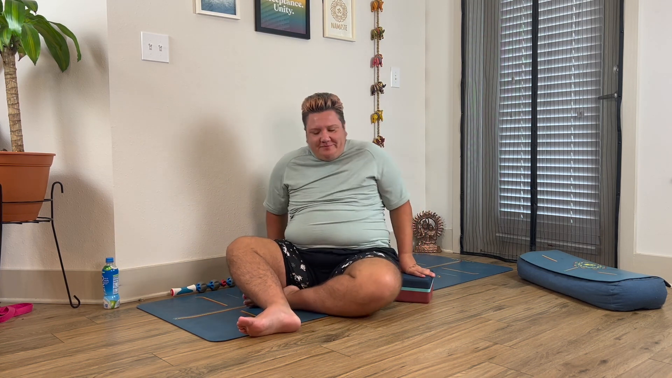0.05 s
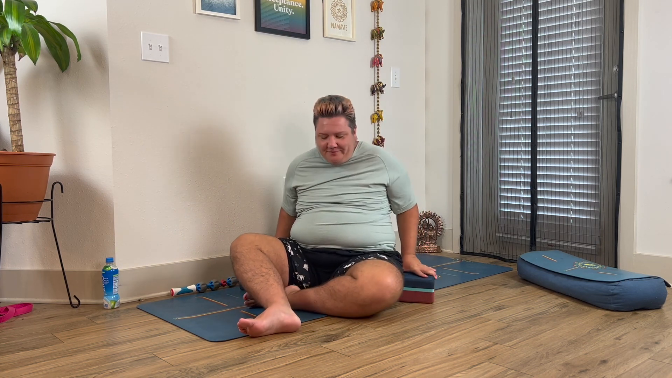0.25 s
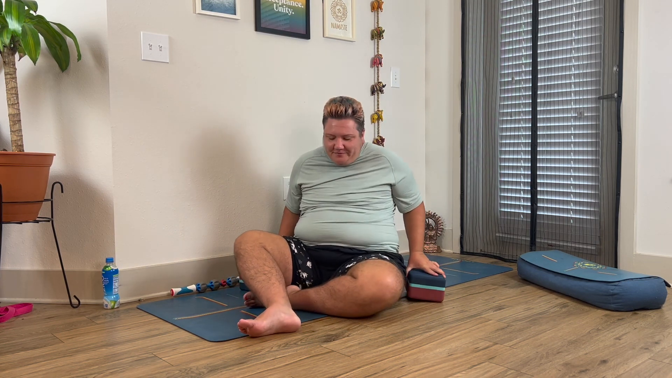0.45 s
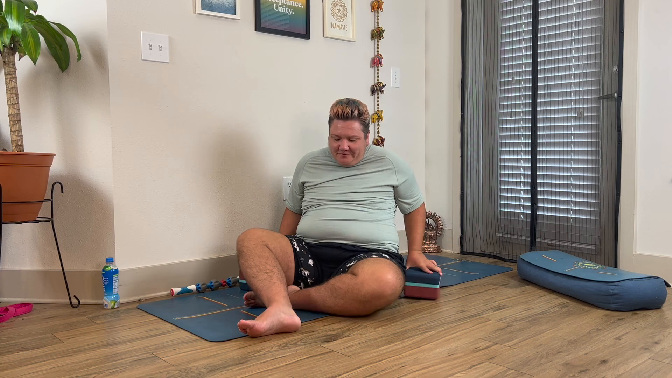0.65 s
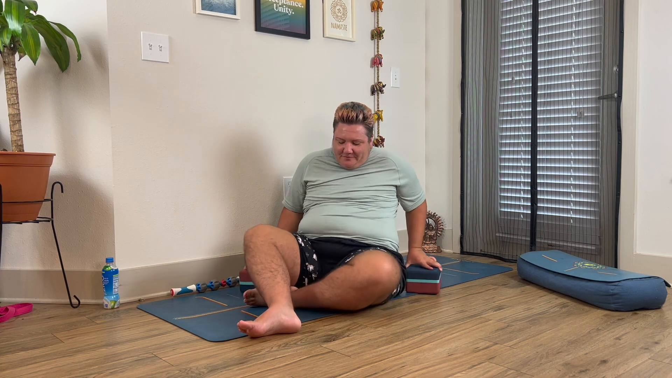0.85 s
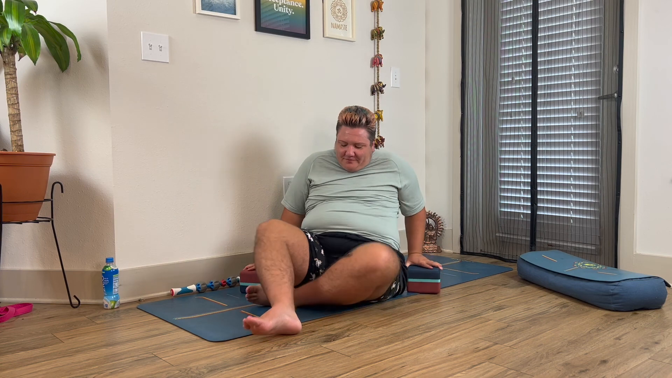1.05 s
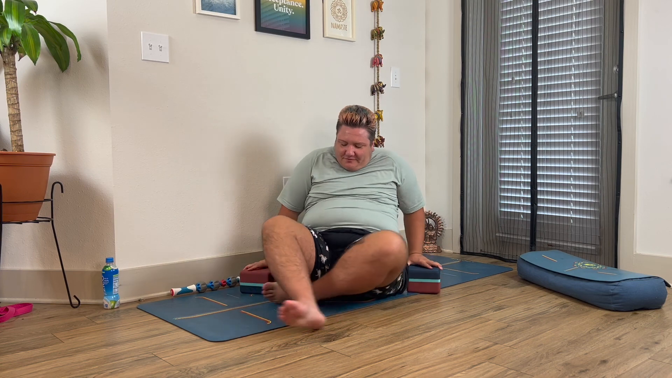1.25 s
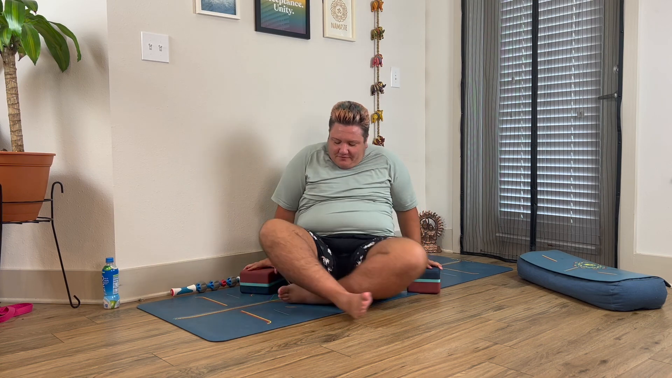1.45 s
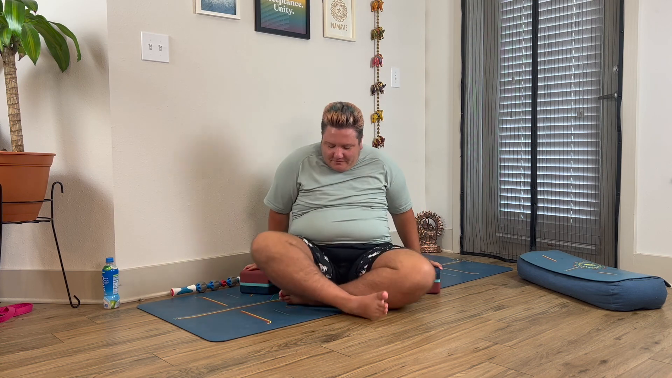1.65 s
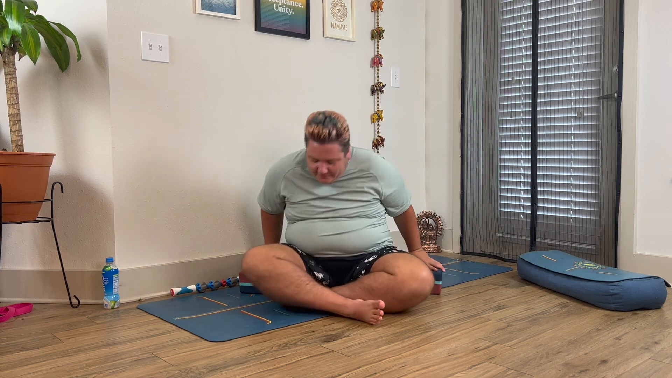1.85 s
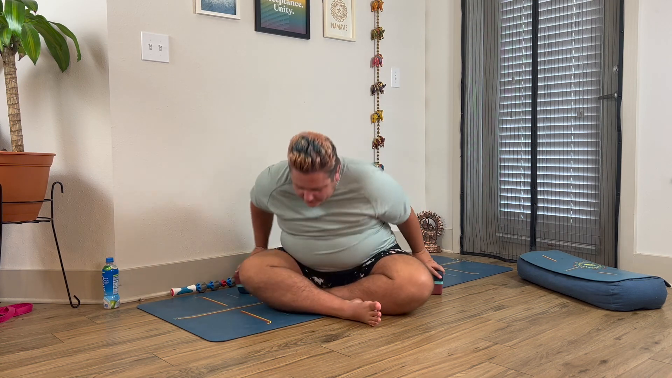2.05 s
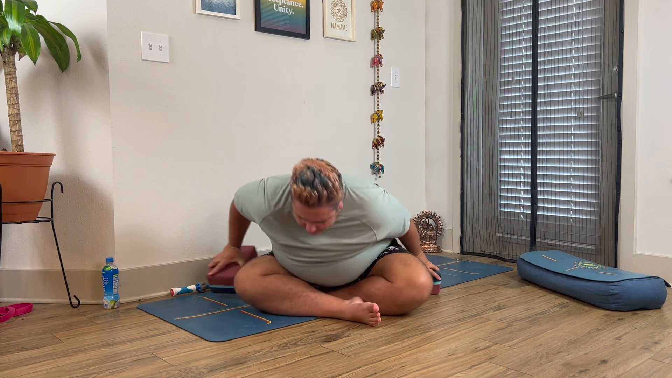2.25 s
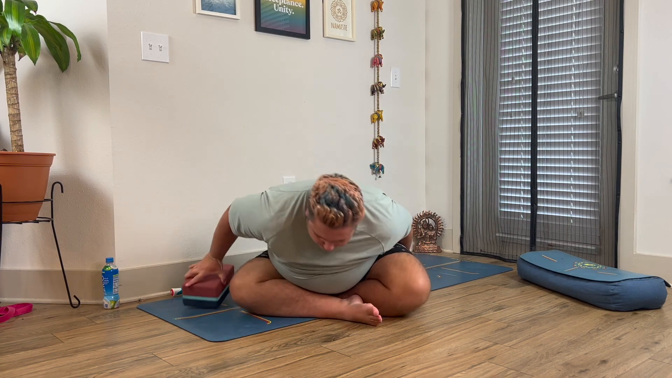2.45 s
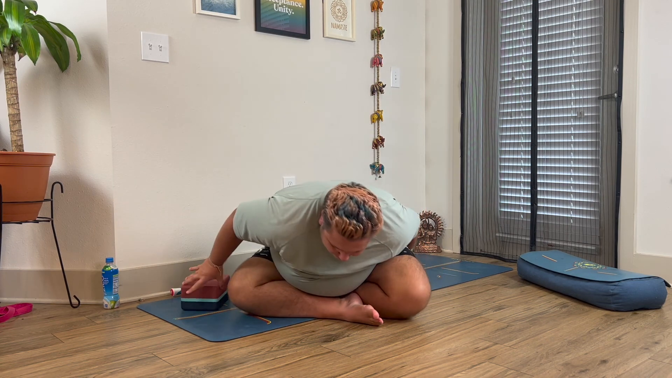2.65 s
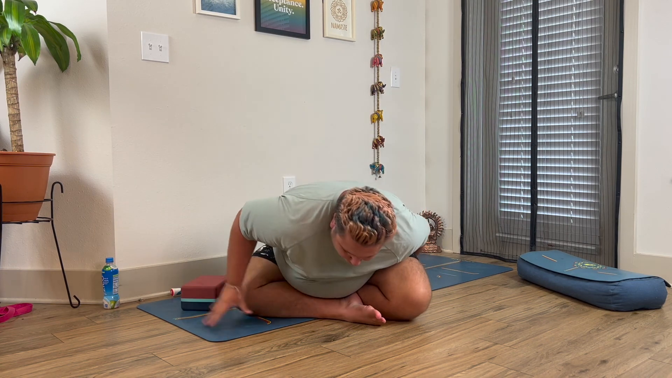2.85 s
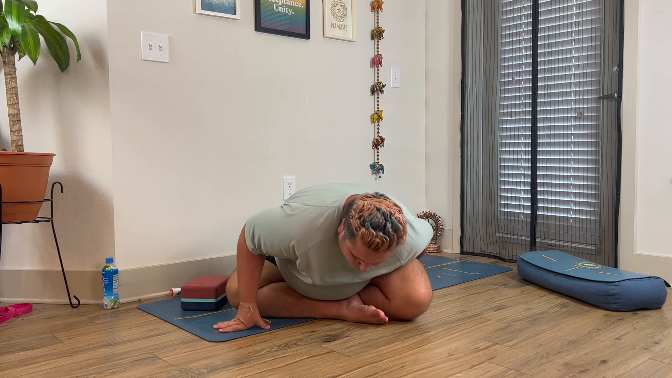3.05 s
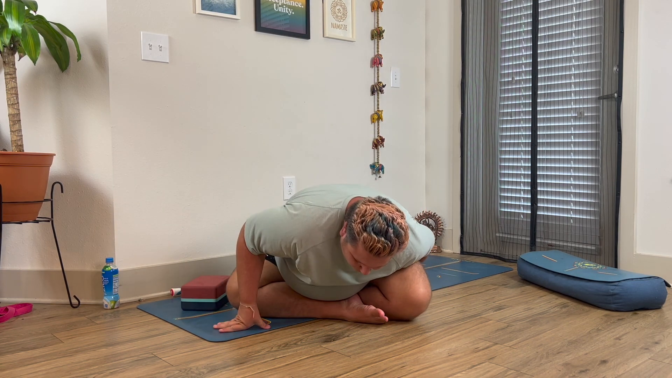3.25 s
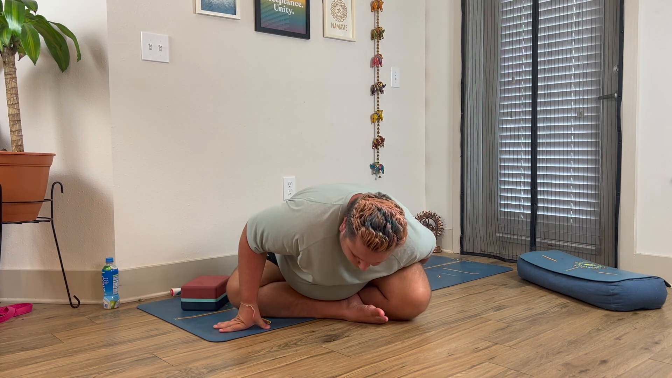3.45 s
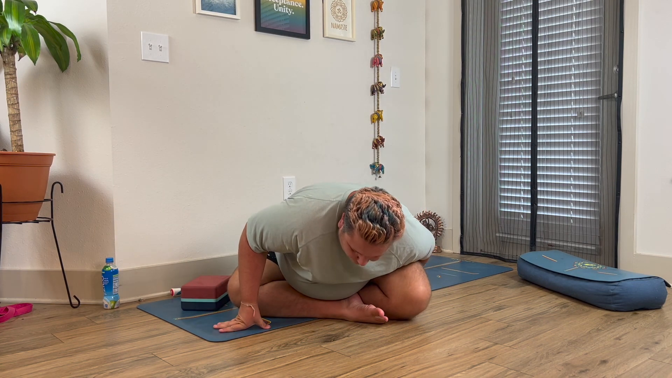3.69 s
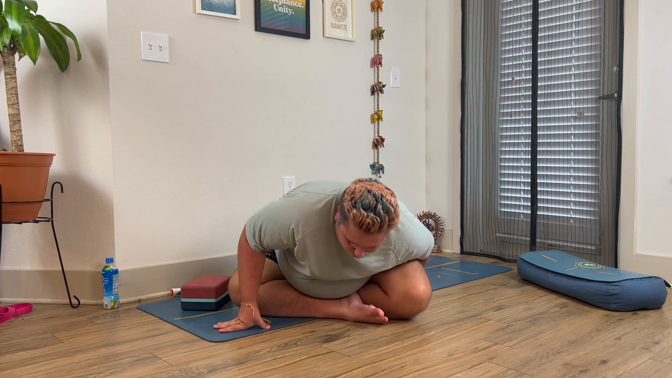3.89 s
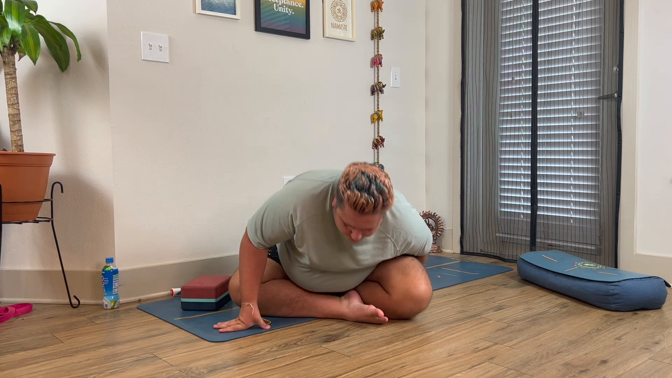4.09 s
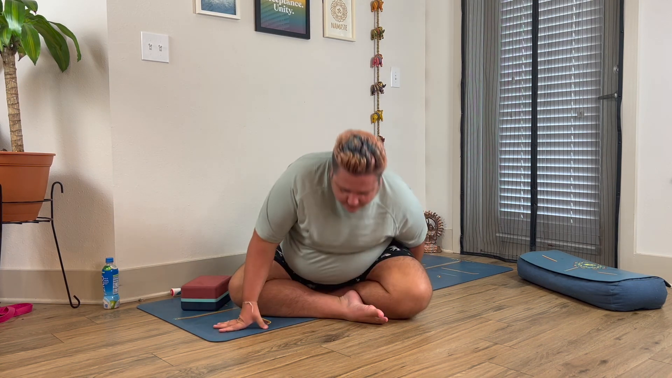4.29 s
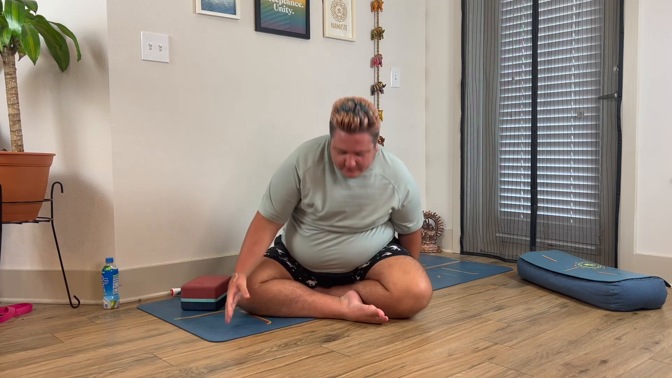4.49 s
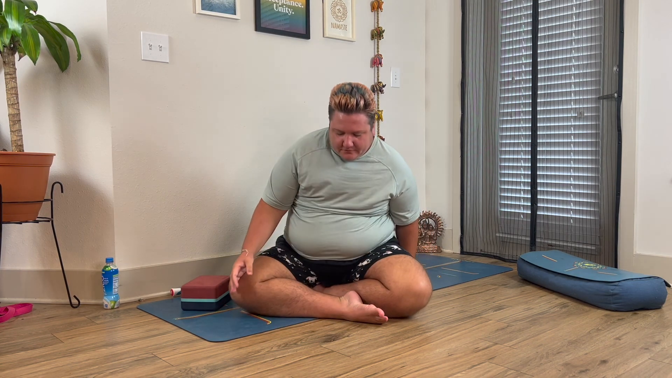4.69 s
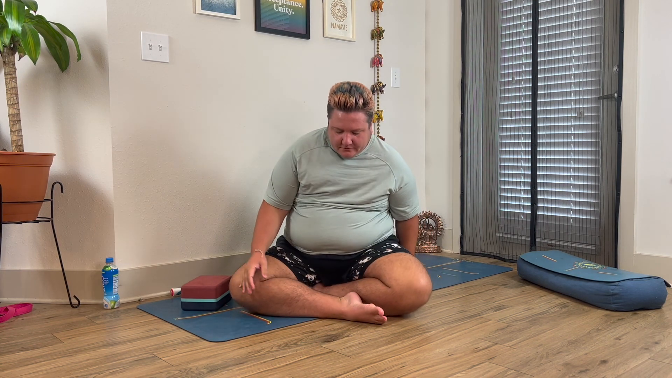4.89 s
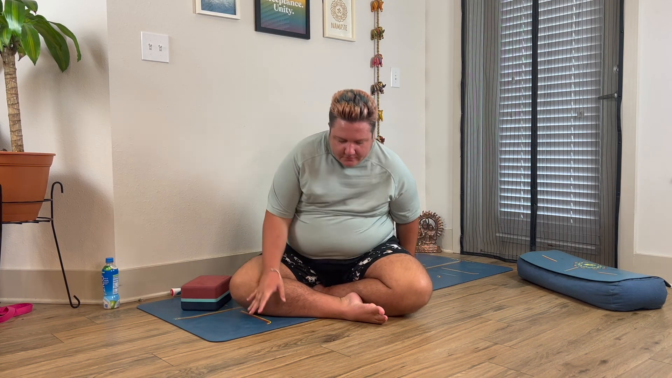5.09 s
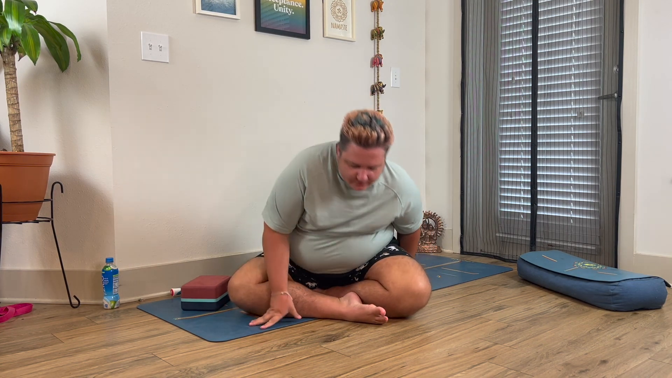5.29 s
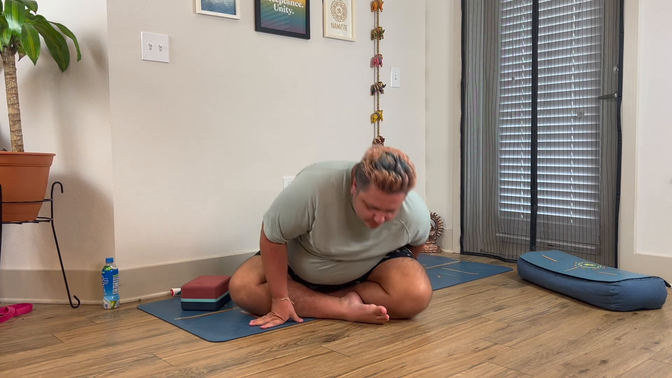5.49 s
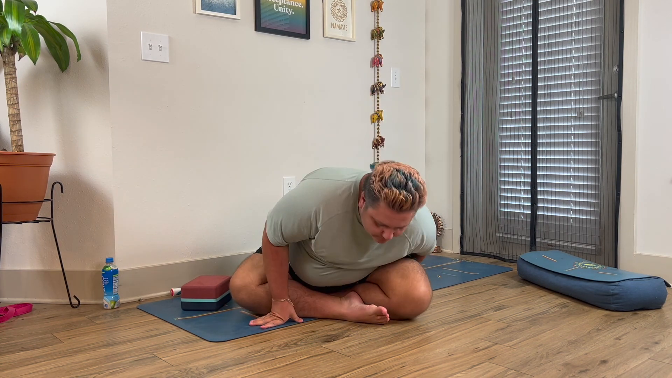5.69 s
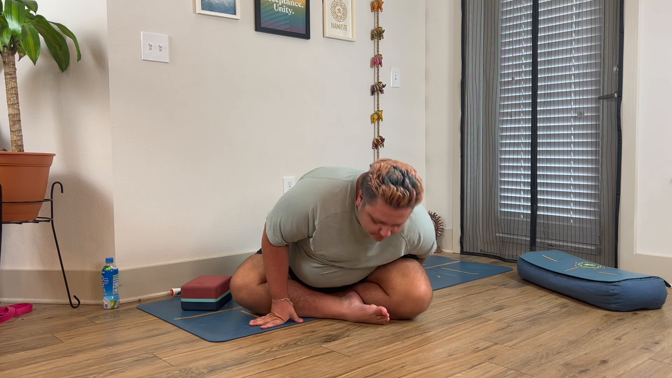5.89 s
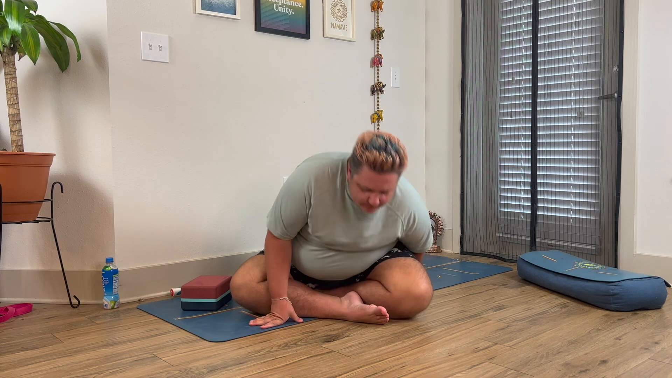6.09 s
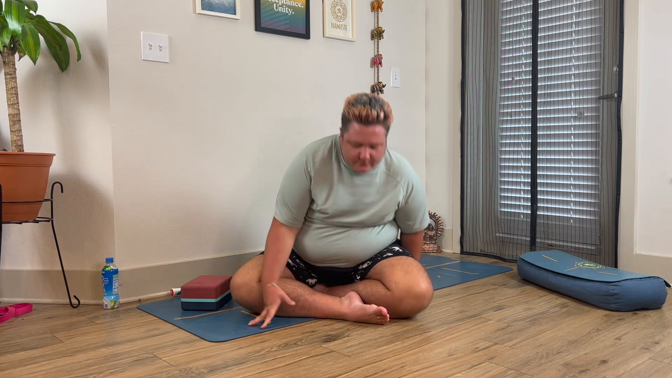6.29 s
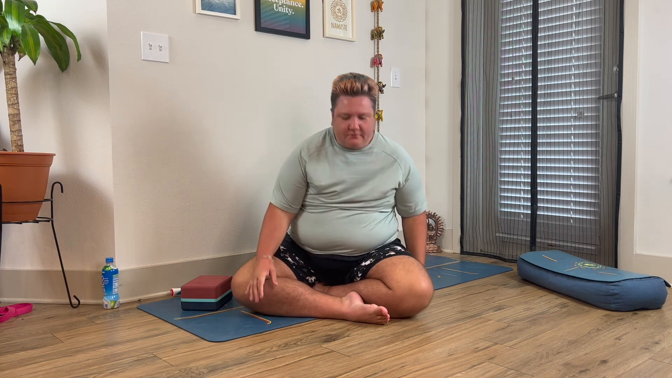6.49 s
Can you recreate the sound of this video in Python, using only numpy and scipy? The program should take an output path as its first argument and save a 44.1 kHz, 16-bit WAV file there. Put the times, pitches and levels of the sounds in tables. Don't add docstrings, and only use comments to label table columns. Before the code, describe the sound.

In a small quiet room with a faint distant appliance hum, foam and clothing rub over a padded mat in uneven strokes with brief squeaky chatter. Shifting body weight knocks dully on the wooden floor, then a foam block lands with a loud, low slap and short ring. Brushing fades, leaving near stillness, tiny rustles and ticks, and a soft brush at the end. Stereo pickup from a small device microphone.

```python
import sys
import numpy as np
from scipy import signal
from scipy.fft import rfft, irfft, next_fast_len
from scipy.io import wavfile
from scipy.ndimage import uniform_filter1d, map_coordinates

SR = 44100
rng = np.random.default_rng(int(sys.argv[2]) if len(sys.argv) > 2 else 0)


def level_to_linear(level):
    exponent = np.asarray(level, float) / 20
    return 10 ** exponent


def pcm_store(signal):
    levels = np.round(np.clip(np.atleast_2d(signal), -1, 1) * 32767)
    wavfile.write(sys.argv[1], SR, levels.astype(np.int16).T)


N = 288325
T = np.arange(N) / SR

# time in seconds, level in dB.
HUM_BEAT = [(0.0, -61), (0.56, -65.5), (0.75, -58.5), (1.3, -70), (1.66, -64.5), (1.98, -71), (2.4, -59),
            (3.13, -61.5), (3.7, -69.5), (4.04, -63.5), (4.45, -70), (4.73, -64), (5.21, -69.5), (5.7, -62),
            (5.95, -71), (6.28, -62.5), (6.54, -67)]
# crest in seconds, rumble in dB, rise and fall in seconds.
RUMBLE_SWELLS = [(.05, -61, 0.17, 0.37), (.5, -58, 0.12, 0.23), (1.55, -57, .08, 0.044), (1.02, -50.5, 0.34, 0.12),
                 (1.86, -54.5, 0.24, .35), (2.64, -41, 0.17, 0.16), (2.9, -51.5, .2, 0.32), (3.25, -58, 0.14, 0.11),
                 (3.4, -57, .08, .08), (3.63, -56.5, 0.12, 0.071), (4.12, -65, .15, 0.11), (4.7, -62, .15, 0.35),
                 (5.46, -57.5, 0.11, 0.041), (5.6, -67, 0.068, 0.19), (6.07, -65, 0.07, 0.09)]
# frequency in Hz, density in dB per Hz.
BOARD_COLOUR = [(20, -63.5), (35, 4), (60, 11), (110, 3.5), (200, -9.5), (400, -41)]
AIR_COLOUR = [(150, -23), (330, -26.5), (520, -35), (1300, -39.5), (1850, -44), (2020, -35.5),
              (2200, -48.5), (2700, -56.5), (6000, -46.5), (6600, -36), (7300, -36.5), (7800, -71),
              (12500, -62.5), (15700, -71.5)]

# crest in seconds, level in dB, rise and fall in seconds.
SCUFFS = [(.11, -63.5, 0.11, 0.23), (.5, -66, .2, 0.31), (.88, -72, .08, .05), (1.45, -68.5, 0.26, 0.096),
          (1.9, -66.5, 0.27, 0.14), (2.1, -65, 0.089, 0.074), (2.22, -59, 0.073, 0.1), (2.5, -66, 0.2, .09),
          (2.8, -61, .1, .07), (2.95, -72, .08, 0.0604), (3.3, -73, .15, 0.083), (4.26, -68, .04, .06)]
# crest in seconds, level in dB, rise and fall in seconds.
DRAGS = [(.1, -59, .25, 0.24), (.32, -53, 0.2, 0.18), (.46, -56.5, 0.074, 0.088), (.59, -53.5, 0.1, 0.13),
         (.72, -55, 0.073, 0.035), (.8, -53, 0.2, 0.15), (1.0, -59.5, 0.067, 0.073), (1.22, -59, 0.2, 0.25),
         (1.5, -60.5, 0.13, 0.069), (1.82, -58, 0.079, 0.089), (1.95, -51, 0.19, 0.1),
         (2.12, -56, 0.1, 0.14), (2.24, -56, 0.08, .12), (2.53, -52, 0.19, .1), (2.64, -44.5, 0.061, 0.067),
         (2.78, -58, 0.087, 0.11), (2.94, -53, 0.12, 0.098), (3.12, -59.5, 0.1, 0.1),
         (3.27, -59, 0.096, 0.095), (3.36, -66.5, .06, .045), (3.565, -69, 0.033, 0.1),
         (4.26, -86, .04, 0.074), (4.44, -79, 0.09, 0.16), (4.77, -82, .1, 0.35), (5.2, -77.5, .1, .1),
         (5.46, -74, 0.19, .1), (5.6, -66.5, 0.12, 0.06), (5.67, -68, 0.046, 0.073),
         (5.95, -79, 0.072, 0.28), (6.33, -74.5, 0.27, 0.09)]
# crest in seconds, level in dB, rise
# and fall in seconds, fine fibres over the cloth in dB.
BRUSHES = [(.12, -61, .3, 0.18, -5.5), (.34, -54, 0.18, 0.11, -5), (.55, -58.5, 0.22, 0.1, -8.5),
           (.79, -51, 0.14, 0.14, -4), (1.02, -56, 0.062, 0.05, -11), (1.12, -67, .06, 0.074, -7),
           (1.26, -58.5, 0.15, 0.11, -3.5), (1.4, -68, .08, .05, -1), (1.485, -52.5, 0.059, 0.062, -3),
           (1.55, -59, 0.055, 0.053, -12), (1.6, -65.5, .06, 0.1, -7), (1.82, -60, 0.17, 0.13, -4.5),
           (1.93, -51.5, 0.11, 0.085, -8), (2.1, -57, 0.081, 0.18, -8.5), (2.25, -59.5, 0.058, 0.15, -4),
           (2.52, -52, 0.14, 0.11, -7.5), (2.63, -51, 0.069, 0.14, -7), (2.93, -56, 0.14, 0.12, -5.5),
           (3.17, -60.5, 0.16, 0.092, -13), (3.27, -58.5, 0.11, 0.12, -5.5), (3.36, -69, .06, 0.058, -14),
           (3.555, -71, 0.016, 0.089, 1.5), (4.1, -78, 0.13, 0.14, 1.5), (4.27, -72.5, 0.067, .12, 0.5),
         (4.44, -77.5, .1, .12, 5), (4.65, -77, 0.065, .14, 3.5), (4.95, -76, 0.2, 0.19, 4),
         (5.21, -74, 0.1, 0.16, 3.5), (5.4, -79, .1, 0.11, 3.5), (5.6, -64, 0.077, 0.08, -7),
         (5.67, -69.5, .06, 0.086, -8), (5.92, -84, .04, .05, 3), (6.03, -77, .05, 0.22, -2),
         (6.2, -71.5, 0.17, 0.092, -2.5), (6.35, -65.5, 0.11, 0.15, 0.5), (6.53, -63.5, 0.14, .1, -4.5)]
# frequency in Hz, density in dB per Hz.
SCUFF_COLOUR = [(120, -25.5), (200, 8), (330, -0.5), (500, -4), (700, -10), (1100, -30)]
FOAM_COLOUR = [(400, -36), (620, -17), (740, -9), (820, -4.5), (900, -4.5), (1050, -6.5), (1250, -2),
               (1600, -3.5), (2400, -4.5), (4000, -12), (8000, -22.5)]
CLOTH_COLOUR = [(500, -20), (1500, -9.5), (3000, 0.5), (5200, 2.5), (7500, -1), (9500, -9), (13000, -40)]
FIBRE_COLOUR = [(5000, -24), (7500, -12), (9500, -5.5), (11600, -1), (14200, -0.5), (15000, -6.5),
                (15700, -15)]
# time in seconds, centre in Hz.
GRIP = [(0.0, 1300), (.2, 1350), (.34, 1900), (.47, 1500), (.58, 2480), (.65, 2220), (.72, 2300),
        (.8, 1440), (1.38, 1300), (1.5, 2400), (1.7, 1310), (1.9, 1900), (2.14, 1500), (2.5, 1330),
        (3.0, 1250), (3.13, 2200), (3.26, 1900), (3.38, 1940), (6.54, 1600)]

# crest in seconds, level in dB, half length in seconds, pitch in Hz.
CHATTERS = [(.05, -68, .06, 1300), (.22, -64, .06, 1380), (.28, -60, .05, 1580), (.33, -62, .05, 2050),
            (.42, -65, .06, 820), (.46, -65, .03, 1800), (.57, -66, .05, 830), (.58, -62, .04, 2620),
            (.62, -63, .04, 2050), (.63, -65, .06, 1330), (.71, -62, .05, 2200), (.73, -64, .04, 1200),
            (1.0, -66, .03, 1400), (1.8, -65, .05, 1850), (1.86, -59, .05, 1400), (1.87, -64, .05, 2700),
            (1.91, -60, .04, 1900), (1.94, -61, .02, 1500), (1.97, -62, .05, 1250), (1.97, -64, .04, 780),
            (2.12, -62, .04, 1400), (2.21, -61, .06, 1280), (2.23, -63, .04, 620), (2.25, -65, .04, 1650),
            (2.29, -64, .03, 1300), (2.9, -52, .04, 1200), (2.94, -60, .05, 1800), (3.16, -68, .05, 2250),
            (3.25, -66, .04, 1900), (3.26, -66, .06, 1250), (3.27, -67, .06, 830)]
# crest in seconds, level in dB, rise and fall in seconds.
PRESSES = [(.2, -68, .15, .1), (.33, -63, .1, .12), (.47, -63, .1, .08), (.58, -63, .08, .1),
           (.72, -62, .08, .07), (1.85, -62.5, .08, .08), (1.97, -62, .07, .06), (2.1, -65, .06, .07),
           (2.21, -63.5, .08, .12), (3.14, -68.5, .06, .06), (3.26, -63, 0.06, .09), (3.35, -70, .05, .04),
           (5.6, -76, .1, .1)]
# frequency in Hz, width in Hz, level in dB.
BLOCK_MODES = [(830, 79, 0), (1290, 130, -1.5), (2680, 300, -5)]
# crest in seconds, level in dB, rise and fall in seconds.
CREAKS = [
    (.12, -72, .1, .1),
    (1.3, -68.5, .25, .25),
    (1.95, -67, 0.086, .06),
    (2.09, -64.5, .06, .06),
    (2.2, -60.5, .08, .1),
    (2.3, -66, .05, .04),
    (2.47, -57, .02, .04),
    (5.62, -72, .1, .08),
]

# start in seconds, level in dB, length in seconds,
# dullness as the frequency in Hz above which it fades.
SLAPS = [(0.785, -39, 0.015, 420), (0.83, -40.5, 0.042, 490), (0.879, -46, 0.043, 450),
         (0.855, -50.5, 0.016, 800), (0.784, -47.5, 0.011, 1700), (0.831, -48, 0.041, 1500),
         (2.246, -48.5, 0.018, 6200), (2.7, -51.5, 0.0092, 910), (2.368, -48.5, 0.022, 1310),
         (2.462, -49, 0.016, 1200), (2.595, -38, 0.0076, 2600), (2.594, -28.5, 0.0073, 1600),
         (2.597, -22.5, 0.024, 1100), (2.604, -35, 0.014, 2100), (2.619, -31, 0.0094, 2600),
         (2.628, -24, 0.015, 1500), (2.632, -39, 0.014, 6100), (2.646, -37.5, 0.022, 2370),
         (2.69, -43, 0.055, 2100), (2.76, -50, 0.064, 1860), (2.654, -32, 0.058, 1150),
         (2.85, -44, 0.019, 1740), (2.866, -41.5, 0.03, 1400), (2.911, -54, 0.053, 1280),
         (3.555, -72, .004, 13000), (4.252, -58.5, 0.004, 2100), (4.2528, -55, 0.002, 14500),
         (5.183, -68, 0.047, 1300), (6.1, -61, 0.014, 940), (6.282, -62.5, 0.028, 1460),
         (3.9205, -72, .003, 14000), (5.9055, -68, .003, 14000), (4.265, -66, .003, 14000),
         (3.0, -56, 0.027, 1400), (2.386, -51, .012, 2200), (2.3735, -42, .006, 1300),
         (1.99, -54, .04, 260), (2.4, -52, .03, 700), (2.79, -43, .03, 700), (6.098, -66, .004, 9000)]
# crest in seconds,
# peak in dB, pitch in Hz, length in cycles.
THUMPS = [(0.798, -24, 124, 1.5), (0.822, -28, 105, 1.2), (.846, -27.5, 198, 2.8),
          (0.865, -20.5, 85.6, 1.7), (0.887, -28.5, 133, 1.9), (0.913, -32, 102, 1.1),
          (0.949, -35, 122, 1.8), (0.834, -33, 348, 4.5), (.86, -35.5, 290, 2.9), (2.415, -30.5, 128, 2.3),
          (1.019, -37.5, 63.6, 3.6), (1.219, -45.5, 54.5, 2.3), (1.26, -48.5, 55.3, 2.3),
          (1.84, -39.5, 142, 1.6), (1.865, -36.5, 100, 1.1), (1.924, -38, 109, 2.3), (1.94, -38, 120, 1.9),
          (1.962, -35, 62.4, 1.9), (2.023, -47.5, 68, 1.4), (.795, -36.5, 285, 2.6), (.885, -39, 330, 4.2),
          (.903, -40.5, 282, 3.7), (.97, -47, 296, 6),
          (2.286, -41, 96, 1.3), (2.378, -41.5, 640, 4.2), (2.384, -35, 193, 2),
            (2.413, -21.5, 73.6, 2.36), (2.489, -32.5, 77, 4.6), (2.515, -36, 85, 3.4),
            (2.607, -12, 277, 1.86), (2.614, -21.5, 387, 3.6), (2.643, -21.5, 397, 4),
            (2.692, -28, 131, 4.1), (2.718, -29.5, 253, 1.8), (2.743, -27, 123, 2.3),
            (2.738, -28.5, 58, 2.6), (2.79, -36, 134, 3.5), (2.64, -13, 80, 2.07), (2.644, -11, 184, 2.33),
            (2.7, -40.5, 68, 1.8), (3.07, -39, 52, 1.9), (2.608, -21.5, 110, 1.1), (2.875, -41, 170, 2.8),
            (2.6, -24, 430, 2.9), (2.625, -27, 836, 8.1), (2.648, -30, 816, 18), (2.621, -33, 2300, 8.1),
            (2.657, -43, 2500, 16), (2.68, -37.5, 760, 9), (2.73, -48, 1260, 22), (2.78, -41.5, 400, 8.4),
            (2.81, -45, 253, 5), (2.875, -44, 800, 15), (2.478, -31.5, 75, 1.6), (2.555, -37, 72, 2.5),
            (2.587, -33, 75, 2.2), (2.71, -30, 81, 2), (2.47, -40, 130, 3.5), (2.625, -23.5, 190, 1.67),
            (3.1, -46, 70, 1.5), (2.83, -48.5, 520, 8), (3.0, -42, 55, 1.5), (.99, -43, 135, 7),
            (2.88, -46, 135, 9)]
# frequency in Hz, time in seconds to die by 60 dB.
ROOM_DECAY = [(50, 0.4), (200, 0.43), (500, 0.39), (1000, 0.47), (3000, 0.39), (10000, 0.33)]

# frequency in Hz, side level in dB, likeness of side to mid from 0 to 1,
# phase of that likeness in turns.
STEREO_PICTURE = [(60, -12.5, 0.1, .5), (205, -10, 0.56, 0.72), (500, -2.5, 0, 0.21),
                  (1500, -2.5, 0.55, 0.24), (2500, -3, 0.05, -0.04), (4500, -1.5, 0.72, 0),
                  (5500, 0.5, 0.74, 0), (7060, -1, 0.94, 0), (8600, -1, 0.2, -0.33), (9500, -3, 0.36, 0.61),
                  (11700, 0.2, 0.6, -0.77), (15330, -2.5, .4, -1.3)]
# frequency in Hz, threshold in dB per bin.
TREBLE_FLOOR = [(7000, -135), (9000, -122), (13000, -120), (14500, -110), (15700, -102)]


def unit(x):
    return x / np.sqrt(np.mean(x ** 2) + 1e-20)


def along(points, hz):
    f, *cols = np.transpose(points)
    return np.squeeze([np.interp(np.log(hz + 1), np.log(f + 1), c) for c in cols])


def curve(rows):
    s, value = np.transpose(rows)
    return np.interp(T, s, value)


def wobble(rate):
    knots = rng.standard_normal(int(N * rate / SR) + 4)
    return map_coordinates(knots, [T * rate])


def filtered(x, response):
    m = next_fast_len(N + SR // 2)
    hz = np.fft.rfftfreq(m, 1 / SR)
    return irfft(rfft(x, m) * response(hz), m)[..., :N]


def strokes(rows, still_db):
    t, power = T[::64], level_to_linear(still_db) ** 2
    for s, db, rise, fall in rows:
        distance = (t - s) / np.where(t < s, rise, fall)
        power = power + level_to_linear(db - 10 * distance ** 2) ** 2
    return np.interp(T, t, 10 * np.log10(power))


def rush(spectrum, patchy_db, grain_db):
    z = signal.stft(rng.standard_normal((2, N)), nperseg=512)[2]
    patches = uniform_filter1d(rng.standard_normal(z.shape[1:]), size=8, axis=0)
    patches = uniform_filter1d(patches, size=10, axis=1)
    pair = signal.istft(z * level_to_linear(patchy_db * unit(patches)), nperseg=512)[1][:, :N]
    grains = level_to_linear(grain_db * wobble(350))
    return unit(filtered(pair * grains, lambda hz: level_to_linear(along(spectrum, hz))))


def background():
    rumble_db = strokes(RUMBLE_SWELLS, still_db=-62) + 1 * wobble(5.4)
    rumble = level_to_linear(rumble_db) * rush(BOARD_COLOUR, patchy_db=0.5, grain_db=3)
    hum_hz, side_phase = 240, [[0], [1.5]]
    hum_level = level_to_linear(curve(HUM_BEAT) + 4.0 + 1.74 * wobble(33))
    hum = hum_level * np.sin(2 * np.pi * hum_hz * T + 0.31 * wobble(2.6) + side_phase)
    air = level_to_linear(-66.5) * rush(AIR_COLOUR, patchy_db=2.0, grain_db=0.5)
    return rumble + hum + air


def singing(x, lift_db):
    centre = np.log(curve(GRIP))
    rings = 0
    for hz in np.geomspace(1000, 3000, num=6):
        ring = signal.lfilter(*signal.iirpeak(hz, 3.5, fs=SR), x)
        nearness = np.clip(1 - np.abs(centre - np.log(hz)) * 5 / np.log(3), 0, 1)
        rings = rings + ring * nearness
    return unit(x + level_to_linear(lift_db) * rings)


def rubbing():
    moves = BRUSHES
    scuff_db = strokes(SCUFFS, still_db=-76.5)
    foam_db = strokes(DRAGS, still_db=-80)
    cloth_db = strokes([row[:-1] for row in moves], still_db=-80)
    fibre_rows = [(s, db + fine_db, rise, fall) for s, db, rise, fall, fine_db in moves]
    fibre_db = strokes(fibre_rows, still_db=-89)
    catch = wobble(22.08)
    foam_noise = singing(rush(FOAM_COLOUR, patchy_db=0.6, grain_db=0.4), lift_db=-13.0)
    scuff = level_to_linear(scuff_db + 1.0) * rush(SCUFF_COLOUR, patchy_db=2.0, grain_db=-0.5)
    foam = level_to_linear(foam_db + 0.14 * catch - 0.5) * foam_noise
    cloth = level_to_linear(cloth_db + 0.59 * catch - 1.0) * rush(CLOTH_COLOUR, patchy_db=1.64, grain_db=0.57)
    fibre = level_to_linear(fibre_db + 0.45 * catch + 2.0) * rush(FIBRE_COLOUR, patchy_db=2.5, grain_db=0.65)
    return scuff + foam + cloth + fibre


def chatter():
    lead = SR // 10
    out, t = np.zeros((2, N + SR)), np.arange(-lead, lead) / SR
    for s, db, half, hz in CHATTERS:
        b, a = signal.iirpeak(hz, 8, fs=SR)
        noise = rng.standard_normal((2, len(t)))
        tone = unit(signal.lfilter(b, a, signal.lfilter(b, a, noise)))
        start = round(s * SR)
        out[:, start:start + len(t)] += level_to_linear(db - 10 * (t / half) ** 2) * tone
    return out[:, lead:lead + N]


def pressing():
    grit, creak = rng.standard_normal((2, 2, N))
    ring = 0
    for hz, width, db in BLOCK_MODES:
        mode = signal.lfilter(*signal.iirpeak(hz, hz / width, fs=SR), grit)
        ring = ring + level_to_linear(db) * unit(mode)
    pad_band = signal.butter(3, [540, 1200], "band", fs=SR, output="sos")
    pad = signal.sosfilt(pad_band, creak)
    return level_to_linear(strokes(PRESSES, -110)) * unit(ring) + level_to_linear(strokes(CREAKS, -110)) * unit(pad)


def slaps():
    out, t = np.zeros((2, N + SR)), np.arange(SR // 4) / SR
    for s, db, length, dull_hz in SLAPS:
        band = [min(170, dull_hz / 2), min(dull_hz, SR / 3)]
        soft = signal.butter(4, band, "band", fs=SR, output="sos")
        noise = unit(signal.sosfilt(soft, rng.standard_normal((2, len(t)))))
        swell = 1 - np.exp(-t / (0.18 * length))
        fade = np.exp(-(t / length) ** 2)
        start = round(s * SR)
        out[:, start:start + len(t)] += level_to_linear(db) * noise * swell * fade
    return out[:, :N]


def thumps():
    out = np.zeros((2, N))
    for s, db, hz, cycles in THUMPS:
        near = slice(round((s - .1) * SR), round((s + .1) * SR))
        t = T[near] - s
        side_db = -9 if hz < 160 else -1.5
        envelope = level_to_linear(db - .5 * np.log(10) * 2.27 * (3.44 * t * hz / cycles) ** 2)
        swing = np.cos(2 * np.pi * (hz * t + rng.random((2, 1))))
        out[:, near] += level_to_linear([[0], [side_db]]) * envelope * swing
    return out


def room(x):
    hz, t, z = signal.stft(rng.standard_normal((2, 2, SR)), SR, nperseg=1024)
    decay = level_to_linear(-60 * t / along(ROOM_DECAY, hz)[:, None])
    tail = signal.istft(z * decay, SR, nperseg=1024)[1]
    tail = tail / np.linalg.norm(tail, axis=2, keepdims=True)
    tail = np.pad(tail, ((0, 0), (0, 0), (SR // 100, 0)))
    wet = signal.fftconvolve(x[None], tail, axes=2)[..., :N]
    blend = np.array([wobble(14) for _ in wet])
    blend = blend / np.sqrt((blend ** 2).sum(axis=0) + .2)
    return (wet * blend[:, None]).sum(axis=0)


def scene():
    steady = background() + rubbing() + chatter() + pressing()
    slap, low = slaps(), thumps()
    echo = room(low)
    deep = signal.sosfiltfilt(signal.butter(4, 100, fs=SR, output="sos"), echo)
    echo = echo - (1 - level_to_linear(-12)) * deep
    return steady + low + level_to_linear(-6.0) * echo + slap + level_to_linear(-5.0) * room(slap)


def port_gap(hz, centre_hz, half_width_hz, depth_db):
    return level_to_linear(depth_db * np.exp(-((hz - centre_hz) / half_width_hz) ** 4))


def mid_response(hz):
    low_cut = hz ** 2 / (hz ** 2 + 30 ** 2)
    return port_gap(hz, centre_hz=10095, half_width_hz=1200, depth_db=-11.5) * low_cut


def side_response(hz):
    side_db, alike, turns = along(STEREO_PICTURE, hz)
    alike = np.clip(alike, 0, 1)
    level = level_to_linear(side_db) * port_gap(hz, centre_hz=13160, half_width_hz=890, depth_db=-15)
    return level * np.array([alike * np.exp(2j * np.pi * turns), np.sqrt(1 - alike ** 2)])


def audible(pair):
    hz, _, z = signal.stft(pair, SR, nperseg=2048)
    energy = np.abs(uniform_filter1d(np.abs(z) ** 2, size=12, axis=1))
    flicker = np.repeat(rng.standard_normal((2, 65, z.shape[2])), 16, axis=1)[:, :len(hz)]
    keep = energy > level_to_linear(along(TREBLE_FLOOR, hz)[:, None] + 2.5 * flicker) ** 2
    return signal.istft(z * keep, SR, nperseg=2048)[1][:, :N]


def band_limit(x):
    return signal.sosfilt(signal.butter(12, 15730, fs=SR, output="sos"), x)


def record(dry):
    mid = filtered(dry[0], mid_response)
    side = filtered(dry, side_response).sum(axis=0)
    mid, side = audible(np.array([mid, side]))
    pair = np.array([mid + side, mid - side])
    pair = pair / (1 + np.abs(pair / .45) ** 4) ** (1 / 4)
    return band_limit(pair)


dry = scene()
out = record(dry)
pcm_store(out)
```